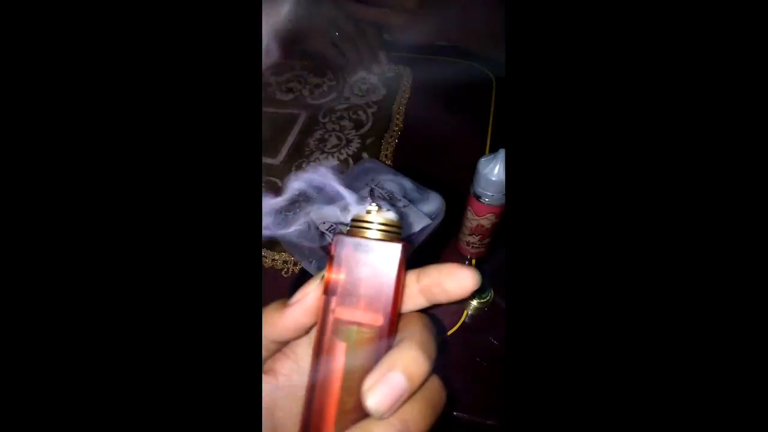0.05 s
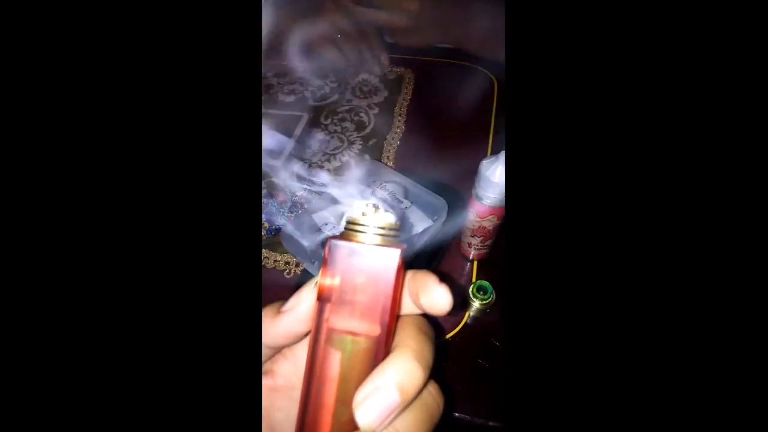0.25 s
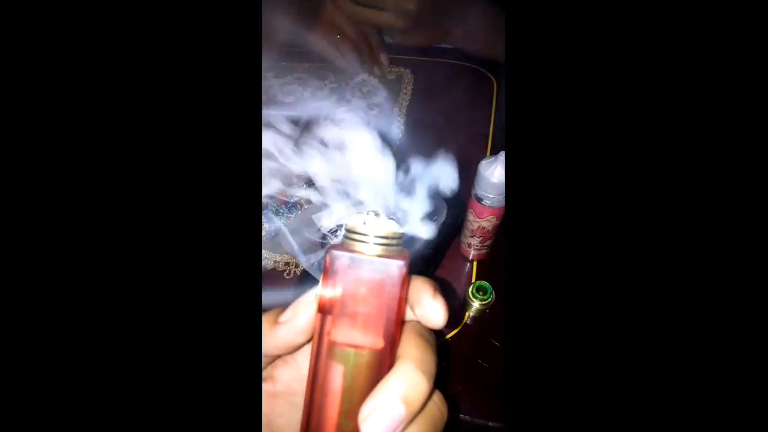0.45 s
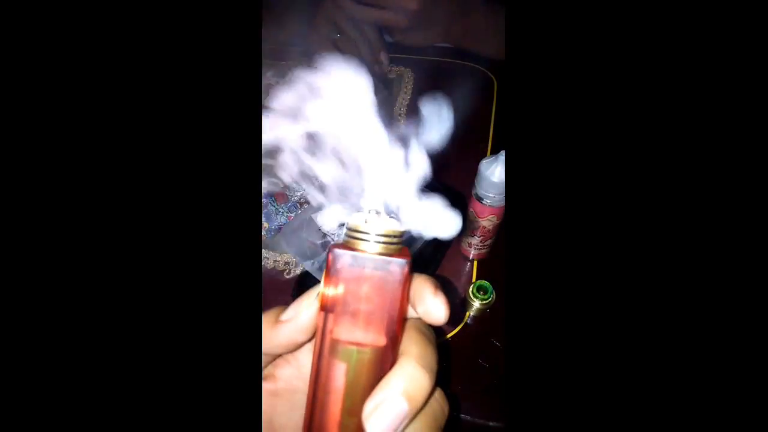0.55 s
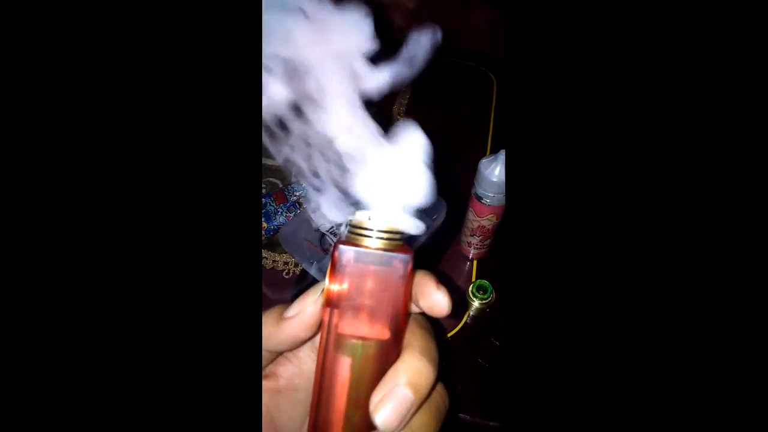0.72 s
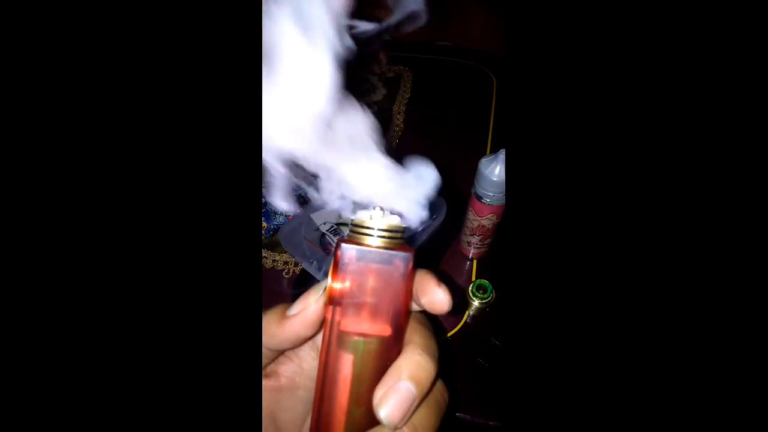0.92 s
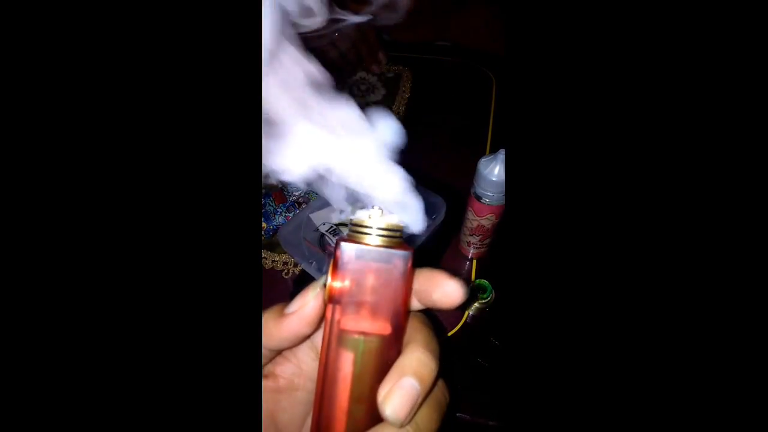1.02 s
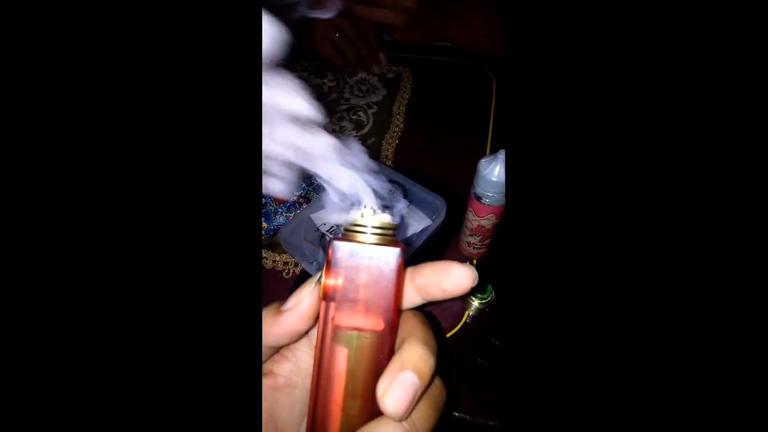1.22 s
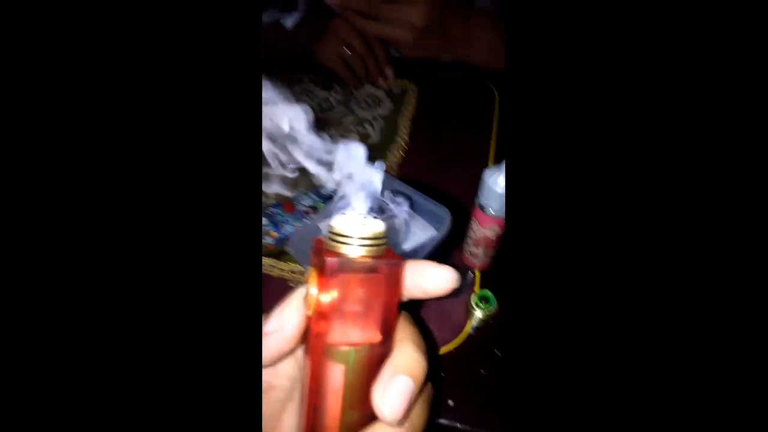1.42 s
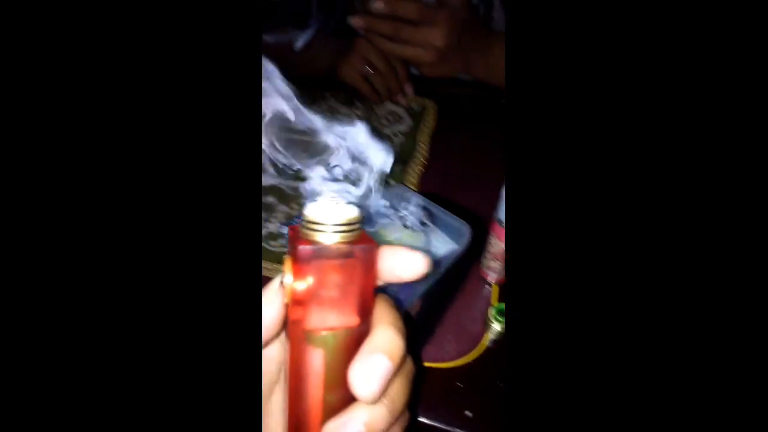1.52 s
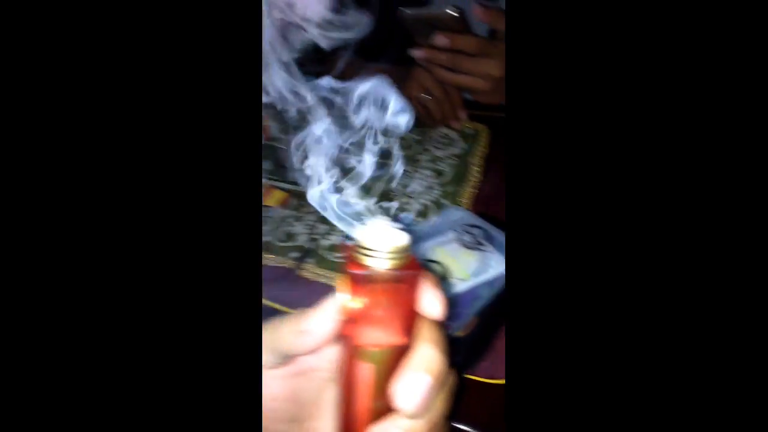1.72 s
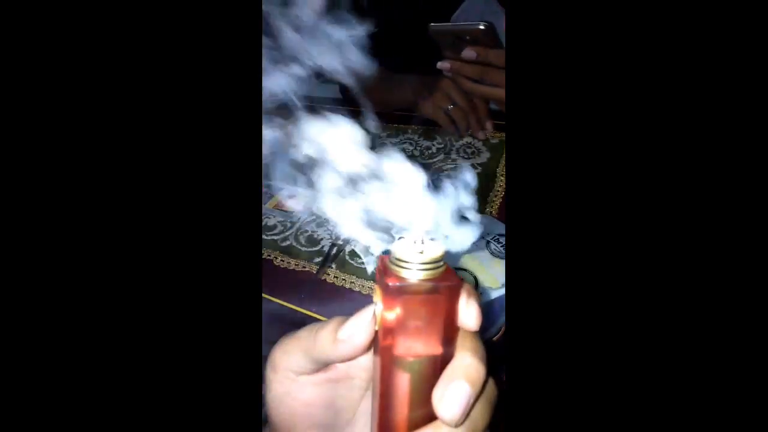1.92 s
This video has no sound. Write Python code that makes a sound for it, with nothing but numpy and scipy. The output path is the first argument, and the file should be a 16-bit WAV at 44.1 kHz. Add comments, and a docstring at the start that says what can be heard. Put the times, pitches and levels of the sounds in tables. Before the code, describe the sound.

A vaporiser coil sizzles and spits close up, with sharp button clicks in a quiet room

```python
"""A quiet room: a vaporiser with an open coil is fired close to the microphone.
The button clicks as two noisy contacts ring the case; liquid on the hot wire boils in a fizz of random
tiny bursts over steam hiss, and spits larger pops, each a pressure cycle with a low puff and a spray.
On release the sizzle sinks to a simmer, then the button is pressed again.
Under it all lie a low rumble of filtered noise, a faint hum of three sines and an even hiss."""
import sys
import numpy as np
from scipy import signal
from scipy.fft import rfft, irfft, next_fast_len
from scipy.io import wavfile
from scipy.ndimage import uniform_filter1d

SR = 44100
rng = np.random.default_rng(int(sys.argv[2]) if len(sys.argv) > 2 else 0)


def transcribe(signal):
    """Save signal, clipped to [-1, 1], as a 16-bit WAV file at the path in sys.argv[1]."""
    frames = np.atleast_2d(signal).T
    limited = np.clip(frames, -1, 1)
    pcm = np.round(limited * 32767).astype(np.int16)
    wavfile.write(sys.argv[1], SR, pcm)


N = 85995
T = np.arange(N) / SR  # s

# Peaks of the close sound's colour, as near reflections or the microphone give it.
# Each row: centre in Hz, bell width (two sigma) in Hz, boost in dB.
NEAR_BELLS = [(680, 200, 4), (1090, 240, 3), (1950, 400, 5), (2950, 520, 5.5), (4300, 620, 3),
              (5200, 280, 4.5), (5670, 320, 4.3), (6850, 480, 4.5), (7770, 200, 5.5), (8620, 280, 6.5),
              (9380, 360, 7), (10100, 520, 5), (11250, 620, 5), (13800, 320, 5), (15090, 240, 4.5)]


def undb(db):
    """Decibels to amplitude ratio."""
    return 10 ** (np.asarray(db) / 20)


def unit(x):
    """Scale to an rms of 1."""
    return x / np.sqrt(np.mean(x ** 2))


def curve(rows):
    """Gain per sample from (s, dB) rows, linear in dB between them."""
    return undb(np.interp(T, *np.array(rows).T))


def add(out, at_s, x):
    """Mix a short sound in at a time."""
    i = max(int(round(at_s * SR)), 0)
    out[i:i + len(x)] += x[:max(N - i, 0)]


def colour(x, points=None, bells=()):
    """Causal minimum-phase filter from a smooth spectrum and bell-shaped peaks."""
    size = 2 * next_fast_len(N)
    f_hz = np.arange(size // 2 + 1) * SR / size
    gain_db = np.zeros(len(f_hz))
    if points is not None:
        hz, level_db = np.array(points).T
        gain_db += np.interp(np.log(f_hz + 1), np.log(hz), level_db)
    for hz, width_hz, boost_db in bells:
        gain_db += boost_db * np.exp(-(2 * (f_hz - hz) / width_hz) ** 2 / 2)
    # fold the cepstrum onto positive time: minimum phase
    cepstrum = irfft(np.log(undb(gain_db)))
    cepstrum[1:size // 2] *= 2
    cepstrum[size // 2 + 1:] = 0
    response = np.exp(rfft(cepstrum))
    return irfft(rfft(x, size) * response)[:N]


def ring(modes):
    """Modes of a struck part: sines of alternating sign, each decaying exponentially."""
    t = np.arange(SR // 16) / SR
    out = np.zeros(len(t))
    for k, (hz, db, t60_s) in enumerate(modes):
        out += (-1) ** k * undb(db - 60 * t / t60_s) * np.sin(2 * np.pi * hz * t)
    return out


def room():
    """A wavering rumble, a faint hum and an even hiss."""
    # Wavering of the rumble. Each row: time in s, relative level in dB.
    rumble_level = [(0, -0.5), (.12, -4), (.2, 4.5), (.23, -3), (.29, 3), (.4, 4.5), (.48, 1), (.85, 2.5),
                    (1.2, 2), (1.29, 3.5), (1.36, -0.5), (1.46, 4.5), (1.55, -2.5), (1.74, 3), (1.81, -4),
                    (1.95, 5)]
    # Rumble spectrum. Each row: frequency in Hz, relative level in dB.
    rumble_colour = [(20, -36), (32, -23), (42, -6.5), (52, 0.5), (70, -1.5), (105, -1.5), (150, -6),
                     (220, -18), (400, -26.5), (1500, -58)]
    # Hum of the room. Each row: frequency in Hz, rms level in dB.
    hum_tones = [(53.5, -64), (308, -73), (667, -82)]
    # Hiss spectrum. Each row: frequency in Hz, relative level in dB.
    hiss_colour = [(60, -21), (200, 1.5), (310, 2.5), (430, -5.5), (700, -10.5), (1500, -15), (4000, -19),
                   (10000, -18.5), (15500, -23)]
    rumble_db, hiss_rms_db = -54.5, -60.5
    rumble = unit(colour(rng.standard_normal(N), rumble_colour))
    rumble = undb(rumble_db) * curve(rumble_level) * rumble
    hum = np.zeros(N)
    for hz, rms_db in hum_tones:
        hum += np.sqrt(2) * undb(rms_db) * np.sin(2 * np.pi * (hz * T + rng.random()))
    hiss = undb(hiss_rms_db) * unit(colour(rng.standard_normal(N), hiss_colour))
    return rumble + hum + hiss


def fizz(spectrum, per_s, spread_db, steam_db, flutter_db):
    """Tiny bursts of uneven size over a hiss of steam, fluttering in level, with the close colour."""
    size = undb(spread_db * np.minimum(rng.standard_normal(N), 2.0))  # capped at two sigma
    hits = rng.random(N) < per_s / SR
    bursts = unit(size * hits * rng.choice([-1, 1], N))
    steam = undb(steam_db) * rng.standard_normal(N)
    flutter = rng.standard_normal(N)
    for _ in range(2):
        flutter = uniform_filter1d(flutter, size=500)
    x = (bursts + steam) * undb(flutter_db * unit(flutter))
    return unit(colour(x, spectrum, NEAR_BELLS))


def simmer():
    """Sparse uneven bursts on the warm wire."""
    # Simmer strength. Each row: time in s, level in dB.
    simmer_level = [(0, -57.5), (.19, -56), (.24, -58), (.33, -62), (.42, -64), (.49, -57), (.6, -51),
                    (1.25, -57), (1.48, -57), (1.68, -58), (1.78, -58.5), (1.95, -56)]
    # Simmer spectrum. Each row: frequency in Hz, relative level in dB.
    simmer_colour = [(200, -15), (700, -0.5), (1500, 2), (3500, -0.5), (5500, 4.5), (7300, 2), (8600, -6.5),
                     (11000, -28), (16000, 1)]
    bubbling = fizz(simmer_colour, per_s=900, spread_db=10, steam_db=1.5, flutter_db=1.26)
    return curve(simmer_level) * bubbling


def boil():
    """Dense bursts of the full boil on the hot wire."""
    # Boil strength. Each row: time in s, level in dB.
    boil_level = [(0, -88), (.44, -75), (.54, -62), (.62, -51.5), (.74, -49), (.84, -49.5), (.905, -48),
                  (.935, -46.5), (1.05, -47.5), (1.13, -47), (1.19, -48.5), (1.24, -52.5), (1.31, -61),
                  (1.95, -76)]
    # Boil spectrum. Each row: frequency in Hz, relative level in dB.
    boil_colour = [(150, -6), (350, -8.5), (550, -7.5), (1500, -4), (3500, -6), (5300, 0), (7200, -5),
                   (10500, -6.5), (12200, -14.5), (15400, -17)]
    bubbling = fizz(boil_colour, per_s=3000, spread_db=8.0, steam_db=1, flutter_db=1.22)
    return curve(boil_level) * bubbling


def pops():
    """Each drop bursts with one pressure cycle, a low puff of escaping steam and a brief spray."""
    # Drops bursting on the wire. Each row: start in s, relative level in dB,
    # pulse time scale in ms, puff level against the pulse in dB.
    drops = [(.0079, -40, 0.052, -31), (0.0151, -37, 0.045, -18), (.0405, -42, 0.042, -26),
             (0.045, -42.5, 0.054, -22), (.0544, -36.5, 0.048, -19), (0.065, -44, 0.058, -22),
             (0.098, -39, 0.044, -22), (0.1366, -40, 0.047, -27), (0.16, -39, 0.055, -21),
             (.399, -35, 0.047, -22), (0.4535, -43, 0.04, -31), (0.4907, -38, 0.042, -28),
             (.5743, -31, 0.064, -20), (0.5852, -29.5, 0.029, -25), (.6123, -37, 0.082, -8),
             (0.6202, -27.5, 0.063, -17), (0.643, -33, 0.078, -22), (0.6663, -30, 0.052, -19),
             (.688, -32, .08, -14), (.743, -25.5, 0.038, -10), (.7606, -29.5, 0.063, -15),
             (0.8011, -33, 0.045, -25), (0.8245, -28.5, 0.071, -28), (0.8495, -27.5, 0.023, -22),
             (0.8647, -18.5, 0.053, -24), (0.9199, -19.5, 0.031, -20), (0.9199, -10, 0.026, -27),
             (.9639, -27.5, 0.026, -24), (0.973, -26, 0.021, -32), (0.9897, -22, 0.015, -26),
             (1.0042, -25.5, 0.081, -20), (1.0307, -24, 0.028, -41), (1.06, -34, 0.062, -19),
             (1.0883, -22.5, 0.061, -25), (1.0948, -26, 0.023, -33), (1.1212, -25.5, 0.019, -24),
             (1.142, -21, .06, -29), (1.7369, -42, 0.035, -26), (1.7567, -37, 0.041, -23),
             (1.7738, -37.5, 0.039, -30), (1.804, -35, 0.035, -25), (1.8248, -34.5, 0.033, -25),
             (1.8304, -37, .045, -25), (1.842, -42, 0.033, -22)]
    # Pop spectrum. Each row: frequency in Hz, relative level in dB.
    pop_colour = [(100, -4), (600, 0), (2000, -9.5), (5500, -1.5), (7500, -2), (10000, -2), (12500, -5),
                  (15000, -12)]
    trim_db, spray_db, spray_decay_s = -0.5, -15.5, 0.0017
    puff_hz, puff_decay_s = 780, 0.00041
    swell_ratio = 1.503  # a bubble swells this many times slower than it collapses
    lead_s = .0005  # room for the swell ahead of the start
    out, t = np.zeros(N), np.arange(SR // 40) / SR
    age = np.maximum(t - lead_s, 0)
    for at_s, db, width_ms, puff_db in drops:
        u = (t - lead_s) / (width_ms / 1000)
        u = np.where(u < 0, u / swell_ratio, u)
        pulse = u * np.exp((1 - u ** 2) / 2)
        puff = undb(puff_db) * np.sin(2 * np.pi * puff_hz * age) * np.exp(-age / puff_decay_s)
        spray = rng.standard_normal(len(t)) * (age > 0) * np.exp(-age / spray_decay_s)
        pop = pulse - puff + undb(spray_db) * spray
        add(out, at_s - lead_s, undb(db + trim_db) * pop)
    return colour(out, pop_colour, NEAR_BELLS)


def button():
    """The switch snaps over and lands: two contacts ring the case."""
    # Fire button pressed, released, pressed. Each row: start in s, relative level in dB,
    # lag of the second contact in s, its level against the first in dB,
    # strongest ring in Hz, its boost in dB, treble level at 10 kHz in dB.
    clicks = [(0.2097, -23, .0009, 2.5, 5200, 5.5, -2.5), (1.1962, -13, 0.00075, 4.5, 2580, 5.5, -2.5),
              (1.6543, -32.5, 0.00046, 6, 6150, 9, -12.5)]
    # Modes of button and case. Each row: frequency in Hz, level in dB, t60 in s.
    case_modes = [(2750, -9.5, 0.0048), (3164, -13.5, 0.016), (3960, -5.5, 0.006), (4420, -13.5, 0.017),
                  (5240, -3, 0.0072), (5600, -9, 0.0098), (6040, -6, 0.0051), (7670, -4, 0.0058),
                  (7910, -9.5, .01), (9410, -5, 0.0087), (10500, -36, 0.0032), (12250, -19, 0.01),
                  (15000, -18, 0.0059)]
    snap_db, snap_decay_s, trim_db = -2.5, 0.0011, -7.5
    out, case = np.zeros(N), ring(case_modes)
    snap_decay = np.exp(-T[:len(case)] / snap_decay_s)
    for at_s, db, lag_s, second_db, ring_hz, boost_db, treble_db in clicks:
        click = np.zeros(N)
        for delay_s, contact_db in ((0, 0), (lag_s, second_db)):
            snap = undb(snap_db) * rng.standard_normal(len(case)) * snap_decay
            add(click, at_s + delay_s, undb(db + contact_db + trim_db) * (case + snap))
        tone = [(300, -26), (1700, -10), (2600, -2.5), (7000, -3.5),
                (10000, treble_db), (15000, treble_db - 7)]  # Hz, dB
        out += colour(click, tone, [(ring_hz, 700, boost_db)])
    return out


def jolt():
    """The biggest spit knocks the body of the device, which rings in its modes."""
    # Modes of the jolted device. Each row: frequency in Hz, level in dB, t60 in s.
    body_modes = [(235, -46.5, 0.042), (360, -53, .022), (712, -31, 0.013), (1070, -55, 0.0081),
                  (5480, -29.5, 0.013), (5600, -36, 0.0094)]
    spit_at_s = .9199
    out = np.zeros(N)
    add(out, spit_at_s, -ring(body_modes))
    return out


def reflections(near):
    """Early reflections off hand and table: convolution with decaying noise from 2 ms on."""
    level_db, decay_s = -26.5, .007
    tail = rng.standard_normal(N) * np.exp(-T / decay_s) * (T > .002)
    tail /= np.sqrt(np.sum(tail ** 2))
    return undb(level_db) * signal.fftconvolve(near, tail)[:N]


def scene():
    """Device sounds with their reflections, over the room."""
    near = boil() + simmer() + pops() + jolt() + button()
    return (near + reflections(near) + room())[None]


def record(dry):
    """The recorder cuts the top: a steep elliptic low-pass."""
    top_hz = 15450
    sos = signal.ellip(10, .2, 70, top_hz, fs=SR, output="sos")  # ripple, stop-band in dB
    return signal.sosfilt(sos, dry)


dry = scene()
out = record(dry)
transcribe(out)
```